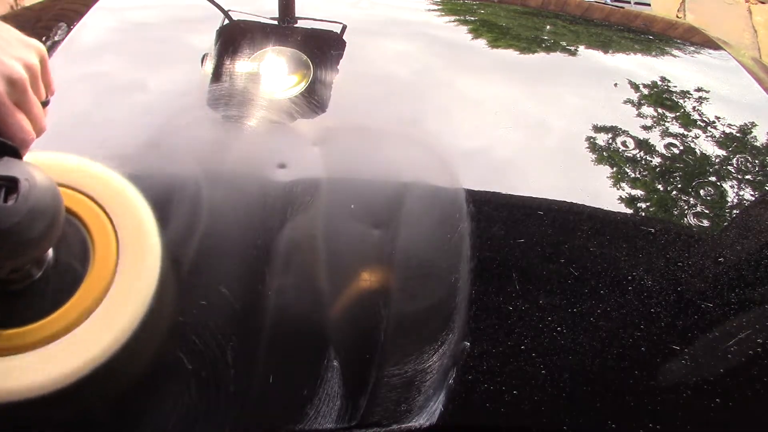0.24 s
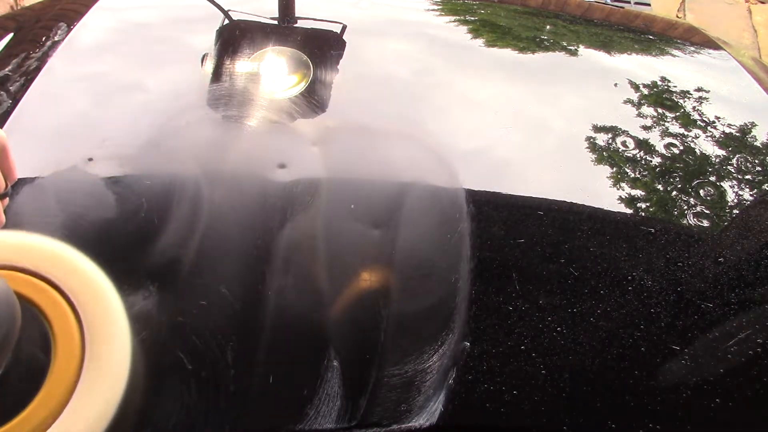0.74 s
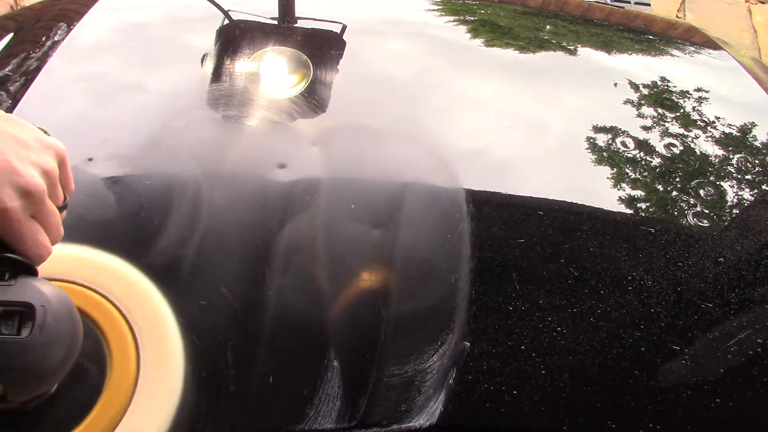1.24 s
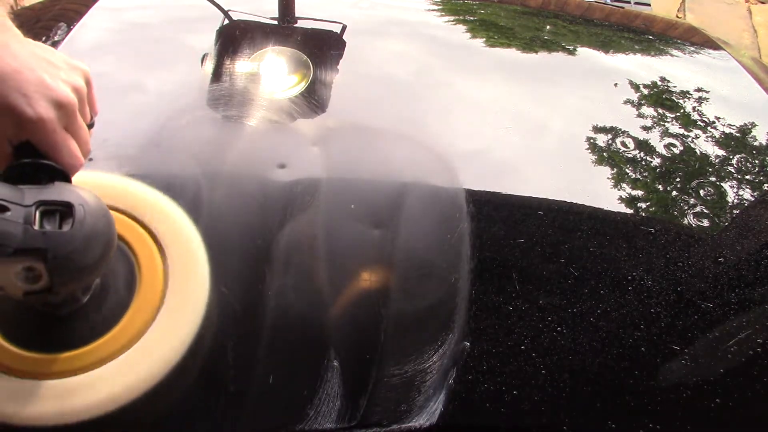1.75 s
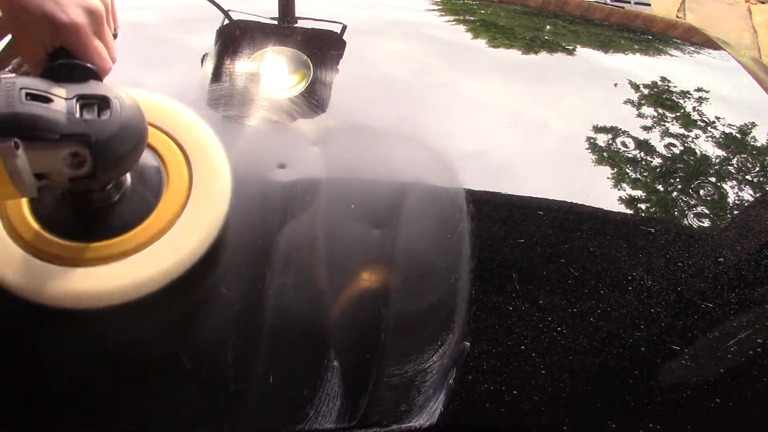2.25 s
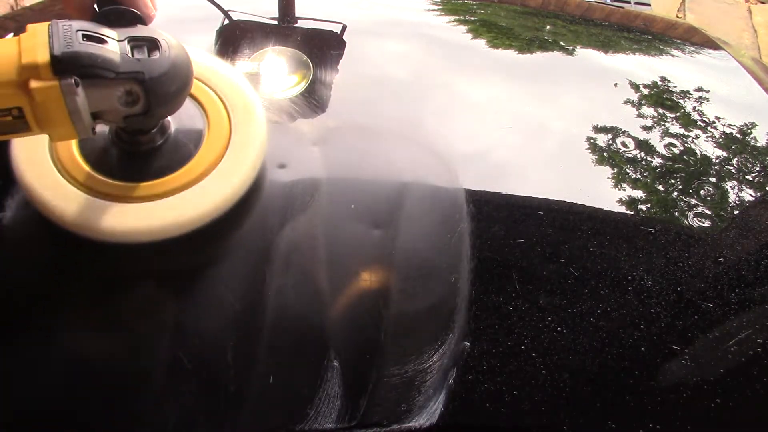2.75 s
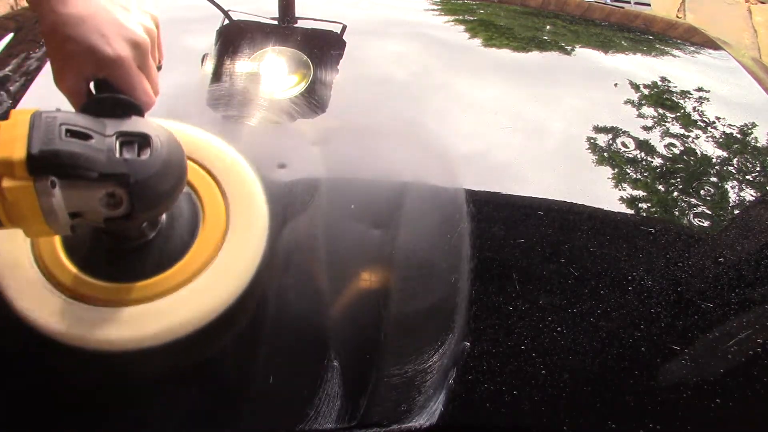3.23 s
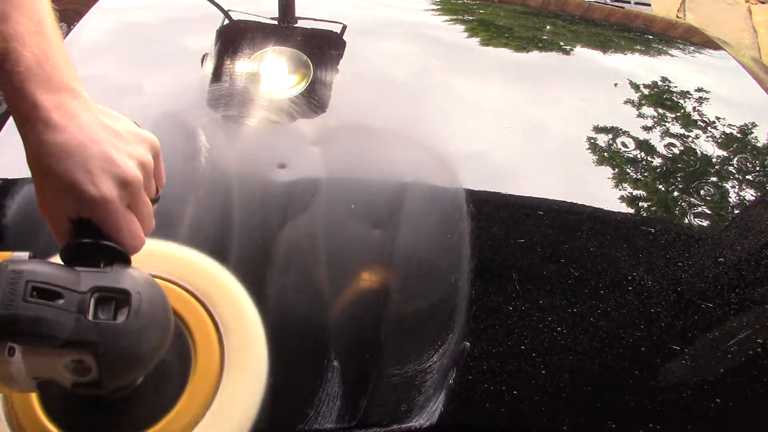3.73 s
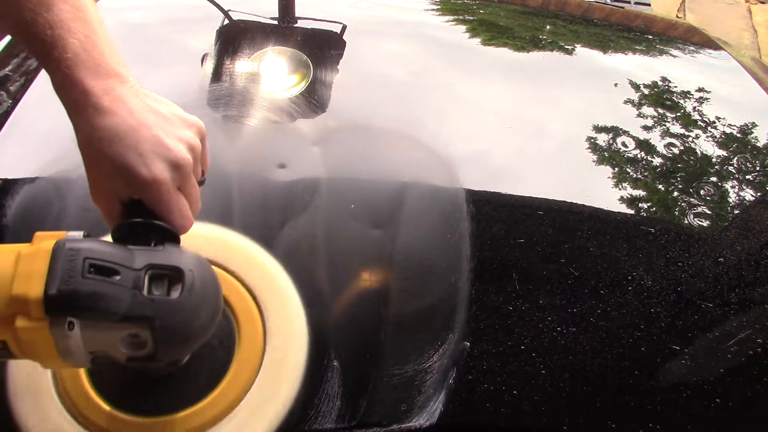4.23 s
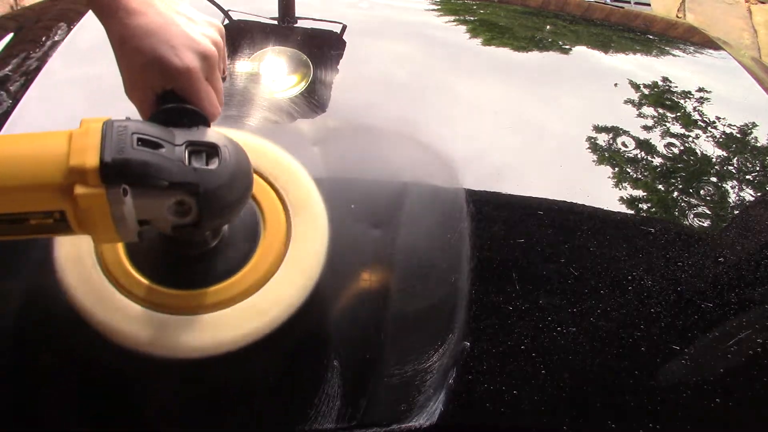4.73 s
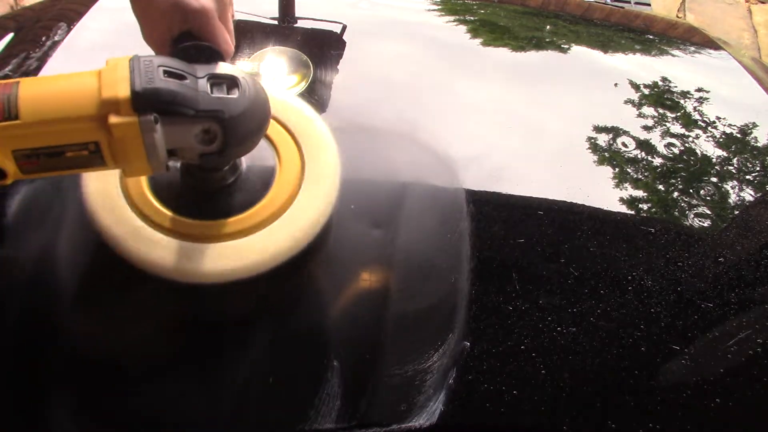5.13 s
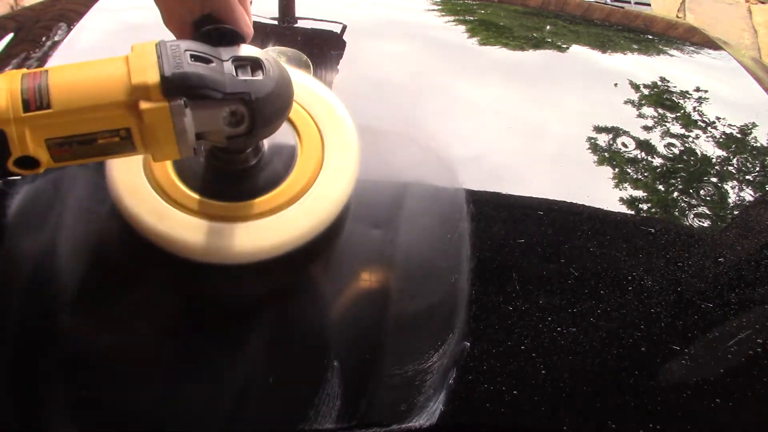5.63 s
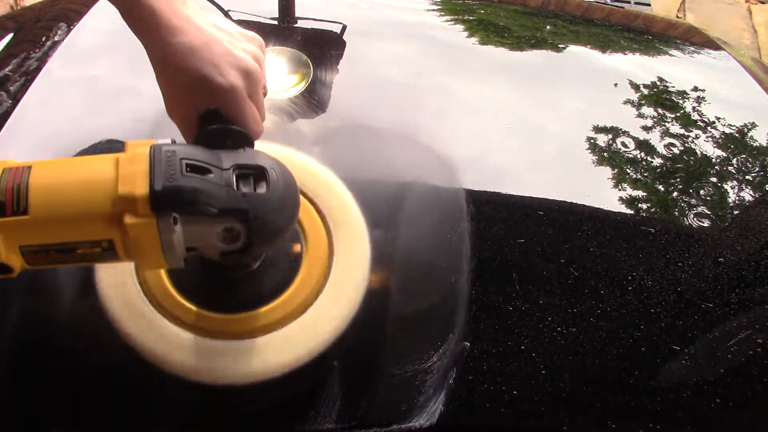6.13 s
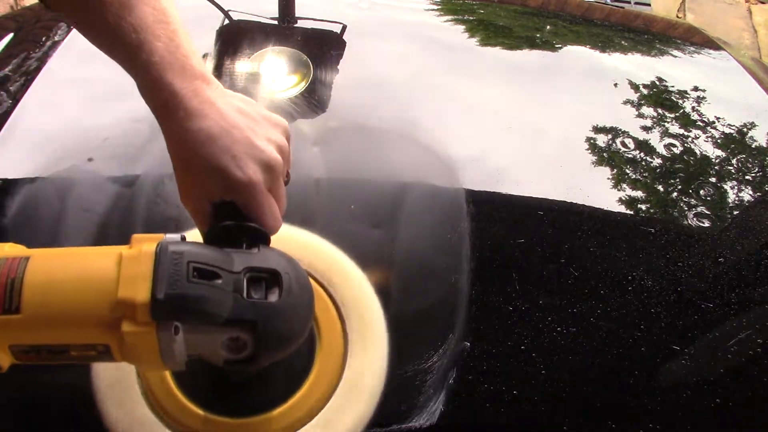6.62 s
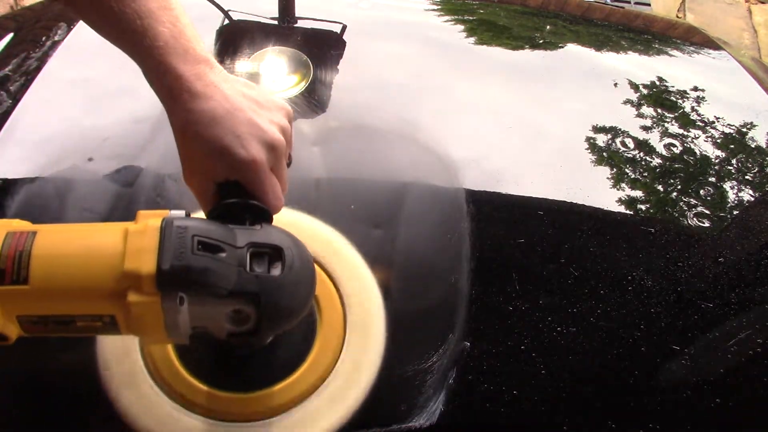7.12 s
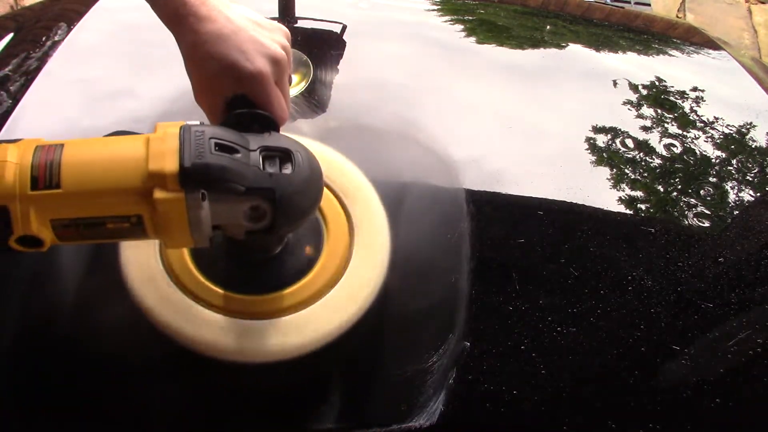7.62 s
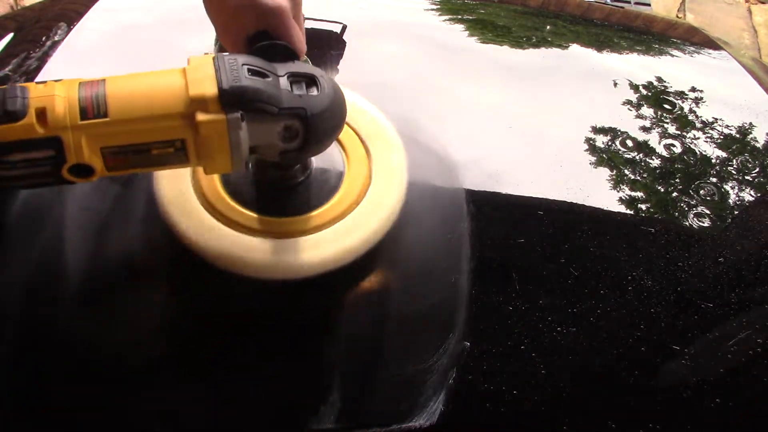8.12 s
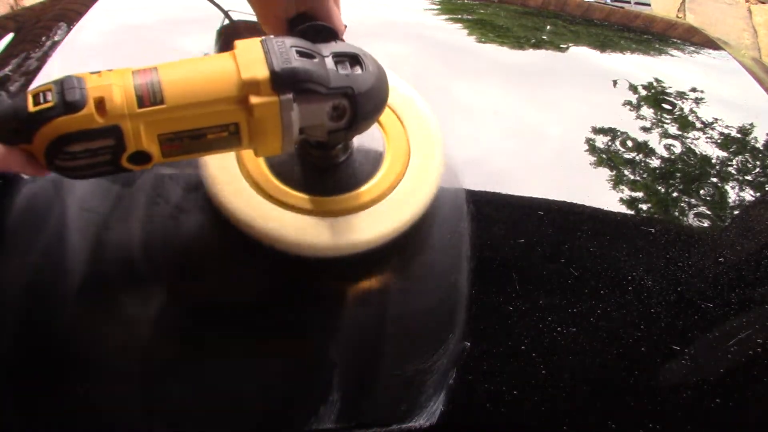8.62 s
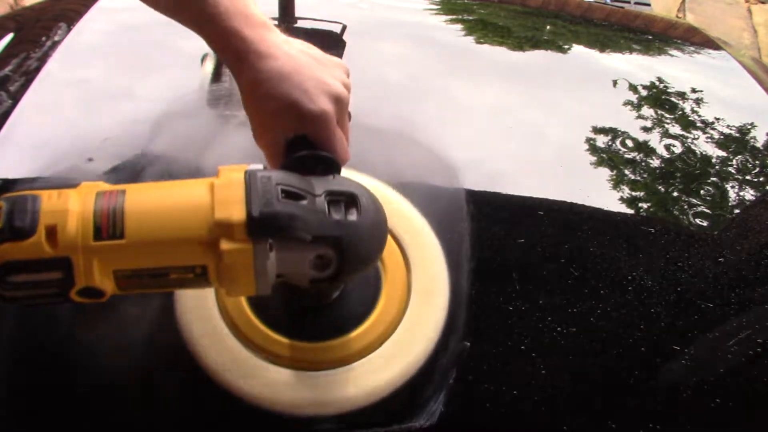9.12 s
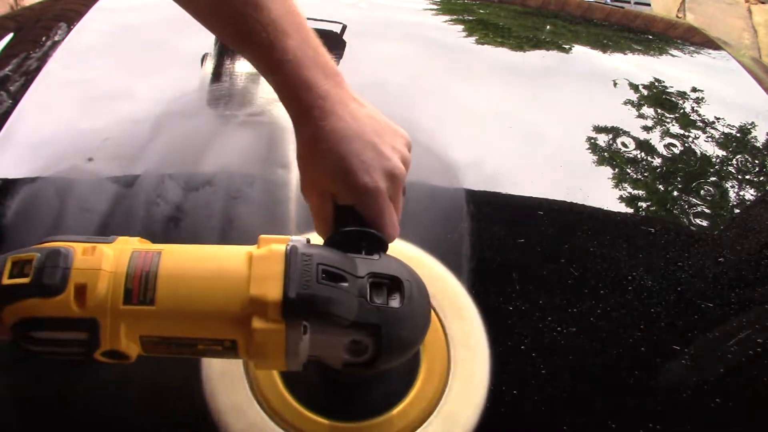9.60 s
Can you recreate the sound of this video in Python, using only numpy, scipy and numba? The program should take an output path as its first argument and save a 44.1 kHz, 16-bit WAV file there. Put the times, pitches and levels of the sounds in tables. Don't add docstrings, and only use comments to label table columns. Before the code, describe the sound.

A rotary polisher runs without a break close to a small camera microphone at an open garage. A bright, layered electric whine sits over gritty gear rattle and rushing motor air. The tone stays nearly steady in pitch but brightens and dulls as the tool sweeps back and forth across the car panel, while a soft metal hum swells and fades beneath.

```python
import sys
import numpy as np
from scipy import signal
from scipy.io import wavfile
from scipy.ndimage import uniform_filter1d, minimum_filter1d, map_coordinates
from numba import njit

SR = 44100
rng = np.random.default_rng(int(sys.argv[2]) if len(sys.argv) > 2 else 0)


def ratio_of_db(decibels):
    return 10 ** (np.asarray(decibels, float) / 20)


def wrap_up_sound(samples):
    columns = np.atleast_2d(samples).T
    tamed = np.clip(columns, -1, 1)
    steps = np.round(tamed * 32767).astype(np.int16)
    wavfile.write(sys.argv[1], SR, steps)


N = 434826
SLOW_S = np.arange(0, N / SR + .01, .01)
RIPPLE_HZ = 120.05

# (time [s], nearness to the loose middle of the panel, pressure,
# roll of the rear vents to the microphone, tilt of the gear case to it)
HOLD = [(0.0, -0.19, 0.066, -0.049, 0.16), (0.41, -0.094, -0.72, 0.48, 0.09), (1.23, -0.02, -1, 0.54, 0.58),
        (1.89, 0.24, 0.12, -0.3, 0.052), (2.07, 0.24, 0.34, -0.33, 0.4), (2.9, -0.077, -0.27, -0.87, -0.05),
        (3.35, 0.3, 0.23, -0.091, 0.09), (4.01, -0.084, -0.81, 0.94, 0.039),
        (4.91, 0.62, 0.41, -0.42, -0.11), (5.52, -0.77, 0.023, -0.66, -0.26), (5.9, 0.2, -0.4, -0.67, -0.2),
        (6.38, 0.42, -0.61, 0.13, 0.15), (6.76, -0.21, -0.73, 0.33, -0.46), (7.82, 0.24, 1.0, -0.17, 0.057),
        (8.49, -1.13, 0.0063, -0.44, 0.4), (8.82, -0.7, 0.089, 0.13, 0.25),
        (9.55, -0.5, -0.075, 0.19, -0.96), (9.86, -0.89, 0.36, 0.025, -0.49)]
# (middle [s], length [s], level [dB], ring frequency [Hz])
PART_GLINTS = [(0.1, 0.9, -3.12, 7950), (0.44, 0.75, -11, 7300), (0.56, 2, -4.5, 8600),
               (0.74, 1.5, -5, 7950), (1.14, 1.3, 3.5, 5100), (2.66, 1.3, 2, 8600),
               (2.76, 0.65, -6.19, 120), (4.96, 1.2, 1.27, 3500), (6.3, 1.3, 2.5, 120),
               (6.56, 1.2, 2.5, 7950), (7.14, 0.55, -1.81, 5100), (7.82, 1.2, -0.3, 5100),
               (8.5, 0.9, 11, 7950), (8.6, 0.8, -0.5, 5100), (9.1, 0.55, 2.5, 5100),
               (9.18, 0.7, -1.2, 3500), (9.7, 0.9, 0, 7300), (9.86, 1.2, -7, 7950)]


def curves(table):
    s, *columns = np.transpose(table)
    return np.array([np.interp(SLOW_S, s, c) for c in columns])


def swells(rows, only=None):
    if only is not None:
        rows = [row for row in rows if abs(row[3] / only - 1) < .015]
    total = 0 * SLOW_S
    for middle, length, size, *_ in rows:
        total = total + size * np.cos(np.pi * np.clip((SLOW_S - middle) / length, -.5, .5)) ** 2
    return total


def fast(slow):
    return np.interp(np.arange(N) / SR, SLOW_S, slow)


def walk(rate):
    k = int(SR / rate)
    steps = np.repeat(rng.standard_normal(N // k + 1), k)[:N]
    return 1.3 * uniform_filter1d(uniform_filter1d(steps, k), k)


@njit
def svf(x, hz, width):
    y, b, l = np.empty(len(x)), 0., 0.
    g, k = np.tan(np.pi * hz / SR), width / hz
    for i in range(len(x)):
        v = (b + g * (x[i] - l)) / (1 + g * (g + k))
        b, l, y[i] = 2 * v - b, l + 2 * g * v, k * v
    return y


def tone(phase, db, beat, flutter, throb):
    lag, start = rng.uniform(-.8, .8), rng.uniform(0, 2 * np.pi)
    size = ratio_of_db(db + 3.5 * flutter * walk(70.)) * (1 + throb * np.cos(beat + lag))
    return np.sqrt(2) * size * np.sin(phase + start + flutter * walk(45.))


def facing_db(hz):
    # (ring frequency [Hz], then [dB] per unit of nearness, pressure, roll, tilt)
    ringing_parts = [
        (1950.0, 0, 0, -1.5, 1.7),
        (3500.0, -2.5, 0.7, -1.7, 4),
        (5100.0, 3, 5.5, 1, -2.5),
        (6430, 6, -1.5, -0.5, 1.5),
        (7300.0, -4.5, -0.5, 7, -0.5),
        (7950.0, 4.5, 0.2, 2, -1.2),
        (8600.0, 0.6, 1, 1.7, -2),
    ]
    parts = np.array(ringing_parts)
    place = np.interp(np.log(hz), np.log(parts[:, 0]), np.arange(7))
    low = min(int(place), 5)
    below, above = (part[1:] @ curves(HOLD) + swells(PART_GLINTS, part[0]) for part in parts[low:low + 2])
    blend = below + (place - low) * (above - below)
    return fast(min(hz / 1800, 1) ** 2 * blend)


def armature_turn():
    # (time [s], armature turns [Hz])
    speed_points = [(0.0, 104.43), (0.91, 104.65), (1.38, 105.59), (1.56, 104.15), (2.84, 104.6),
                    (3.25, 105.12), (3.4, 103.21), (3.69, 105.09), (4.86, 103.34), (5.27, 104.96),
                    (6.1, 105.57), (6.75, 105.23), (6.89, 103.83), (8.04, 103.17), (8.39, 105.7),
                    (9.22, 103.91), (9.55, 106.39), (9.86, 103.0)]
    # (middle [s], length [s], change of turns [Hz])
    hand_shoves = [(0.12, 0.16, -0.44), (0.94, 0.2, -0.35), (1.06, 0.16, 0.47), (1.76, 0.16, 0.55),
                   (2.2, 0.2, -0.58), (2.36, 0.26, 0.63), (2.54, 0.2, -0.48), (4.02, 0.26, -0.33),
                   (4.18, 0.2, 0.6), (4.84, 0.2, -0.36), (5.82, 0.26, -0.74), (6.04, 0.45, 0.36),
                   (7.42, 0.2, 0.66), (7.64, 0.26, -0.65), (7.84, 0.2, 0.46), (8.6, 0.16, -0.42),
                   (8.76, 0.2, 0.45), (8.92, 0.26, -0.31), (9.38, 0.26, -0.39), (9.54, 0.2, 0.54),
                   (9.7, 0.2, -0.54), (9.86, 0.12, 0.7)]
    return 2 * np.pi * np.cumsum(fast(curves(speed_points)[0] + swells(hand_shoves))) / SR


def singing_db():
    # (start [s], length [s], level [dB])
    catches = [(.12, 0.45, -25), (1.58, 0.22, -21), (2.287, 0.74, -16.5), (3.327, 0.23, -19),
               (3.6, .1, -22), (3.74, 0.13, -18), (4.283, 0.49, -18), (5.2, 0.54, -17.5),
               (6.297, 1.35, -18), (7.05, .3, -15), (8.2, 0.5, -19), (9.01, 1.0, -17)]
    rest_db, ramp_s = -27.5, .12
    lifts = []
    for start, length, db in catches:
        inside_s = np.minimum(SLOW_S - start, start + length - SLOW_S)
        lifts.append((db - rest_db) * np.clip(inside_s / ramp_s + .5, 0, 1))
    return fast(rest_db + np.max(lifts, axis=0)) + walk(6.)


def whine(turn, beat):
    # (multiple of the turn, level [dB], then [dB] per unit of nearness, pressure, roll, tilt)
    main_tones = [
        (6.0, -32.0, -0.9, -3, -2.5, 7.2),
        (12.0, -36.5, 0.8, 7, 2.8, -1.5),
        (18.0, -33.5, -4.5, 3.6, -11, 1),
        (42.0, -22.5, -0.5, 0.5, -3.0, -9.9),
        (66.1, -39.5, -4.5, 9, 11, 5),
        (24.0, -22, 4.5, 3, 2.2, 5.5),
        (26.0, -23.5, 0, -0.4, -4, 6.5),
        (27.0, -25, 2.5, 3.5, 6, 11),
        (32.0, -31, -8.5, 8, -0.5, 2),
    ]
    # (level [dB], then [dB] per unit of nearness, pressure, roll, tilt)
    beside_mesh = (-48, -2, -5.5, -6.5, 1)
    # (multiple of the turn, level [dB])
    weak_tones = [(1, -62), (2, -51.5), (5, -44), (11, -50), (14, -53), (17, -35), (19, -35.5), (20, -40),
                  (23, -29), (28, -34), (29, -46), (33, -35.5), (35, -31.5), (36, -34), (38, -33),
                  (40, -32.5), (41, -41), (43, -40), (48, -33.5), (50, -29.5), (57, -44), (60, -56),
                  (61, -50), (67, -40.5), (69, -53), (70, -55), (71, -50), (75, -50), (76, -46.5)]
    # (middle [s], length [s], level [dB], multiple of the turn)
    paint_fades = [(0.34, 0.9, 3.5, 24), (0.6, 1.3, 6, 32), (0.78, 0.55, -14, 18), (1.12, 0.86, -8.5, 24),
                   (1.16, 0.55, -11, 12), (1.74, 0.7, -12, 66), (2.78, 0.7, 0, 27), (3.16, 0.33, -2, 27),
                   (3.5, 1.2, -7, 12), (3.68, 1.1, 2.5, 24), (3.72, 0.87, -5.5, 6), (4.44, 0.55, 4.85, 24),
                   (4.78, 0.62, -5, 26), (4.88, 0.66, 4, 27), (4.96, 0.97, -7, 32), (5.08, 0.4, -4, 6),
                   (5.98, 0.3, -6.43, 27), (6.32, 1.2, 2.5, 6), (6.72, 0.64, -9, 24), (6.78, 0.4, -12, 32),
                   (6.88, 0.4, -9, 6), (6.92, 1, 2.5, 27), (7.26, 0.55, 2, 26), (7.4, 0.42, 4, 6),
                   (7.74, 0.67, -6, 24), (9.06, 0.76, -3, 18), (9.22, 0.43, 7, 26), (9.58, 0.34, -1, 27)]
    out = 0
    for k, db, *lean in list(main_tones) + [(7, *beside_mesh)]:
        k = round(k)
        if k == 42:
            level = singing_db()
        else:
            level = fast(db + lean @ curves(HOLD) + swells(paint_fades, k))
        sound = tone(k * turn, level, beat, flutter=0.31 + 0.0018 * k, throb=0.068)
        if k == 6:
            sound = sound * (1 + .25 * np.cos(6 / 49 * turn))
        out = out + sound
    for k, db in weak_tones:
        level = db + facing_db(105 * k) + 2.2 * walk(1.15)
        out = out + tone(k * turn, level, beat, flutter=0.24 + 0.0021 * k, throb=.25 * min(k / 45, 1))
    return out


def clatter(turn, memory):
    steps = 512
    fresh = rng.standard_normal((int(turn[-1] / (2 * np.pi)) + 3, steps))
    worn = signal.lfilter([1], [1, -memory], fresh, axis=0).ravel()
    return map_coordinates(worn, [turn * steps / (2 * np.pi) + 8], order=3)


def rattle(turn, mains, beat):
    # (frequency [Hz], level [dB per Hz])
    noise_floor = [(40, -20), (130, -11.5), (170, -23), (420, -10), (800, -16.5), (1500, -13), (1900, -4.5),
                   (3100, -7.5), (4700, -6), (5800, -13), (6600, -17), (8600, -21), (10500, -30),
                   (15700, -41)]
    # (frequency [Hz], depth per turn, per half turn, per mains ripple, of the slow throb, grit [dB])
    gate_depths = [(300, 0.12, 0.037, 0.58, 0.024, 2), (2620, 0.026, 0.55, 0.58, 0.014, 0.5),
                   (4700, 0.16, 0.1, 0.17, 0.12, 1.5), (7160, 0.52, 0.13, 0.033, 0.054, 0.3),
                   (12000, 0.14, .12, 0.11, 0.098, 2)]
    # (frequency [Hz], width [Hz], level above the noise [dB])
    housing_rings = [(1215, 181, 8.5), (2592, 157, 9), (2940, 120, -3.5), (3270, 710, 1.5), (4433, 140, 6),
                     (5148, 640, 11.5), (7330, 520, 9), (8070, 360, 7.5)]
    floor, gating = np.transpose(noise_floor), np.transpose(gate_depths)
    grit = rng.exponential(size=N // 40 + 1).repeat(40)[:N]
    sources = [clatter(turn, memory=0.27) for _ in range(3)]
    shudder_db = .4 * walk(60.)
    pressure = fast(curves(HOLD)[1])
    waves = np.cos([turn, 2 * turn, mains, beat]) * (1 + 0.13 * pressure)
    waves[3] *= 1 + .9 * pressure
    centres = np.r_[60 * 2 ** np.arange(0, 4.6, 1 / 4), 1450 * 2 ** np.arange(0, 3.45, 1 / 16)]
    out = 0
    for k, (hz, width) in enumerate(zip(centres, np.gradient(centres))):
        if k % 3 == 0:
            *depth, grit_db = (np.interp(np.log(hz), np.log(gating[0]), g) for g in gating[1:])
            gate = np.exp(depth @ waves) * ratio_of_db(grit_db * grit)
        band = svf(svf(sources[k % 3] * gate, hz, 1.25 * width), hz, 1.25 * width)
        db = np.interp(np.log(hz), np.log(floor[0]), floor[1]) + 10 * np.log10(width)
        for ring_hz, ring_width, lift in housing_rings:
            db += lift * np.exp(-((hz - ring_hz) / (0.5 * ring_width)) ** 2)
        level = db + facing_db(hz) + 0.88 * walk(1.29) + shudder_db
        out = out + band / band.std() * ratio_of_db(level)
    return out / out.std() * ratio_of_db(-15.5)


def panel(turn, mains, beat):
    # (multiple of the mains ripple, multiple of the turn, level [dB], [dB] per unit of roll)
    buzz_tones = [
        (1, 1, -47, -3.5),
        (2, 0, -46.5, 1),
        (1, 2, -55, 0.1),
        (3, 0, -47.5, -1),
        (4, 0, -39.5, -4),
    ]
    # (middle [s], length [s], level [dB])
    stiffener_dips = [
        (.5, .3, -5),
        (.75, .3, -3),
        (1.25, .3, -7),
        (2.75, 0.76, -17),
        (5.45, .8, -14),
        (6.75, .3, -8),
        (8.45, 1.1, -13),
        (9.3, .3, -3),
    ]
    nearness, _, roll, _ = curves(HOLD)
    hum_db = fast(-42 + 11 * nearness + swells(PART_GLINTS, RIPPLE_HZ) + swells(stiffener_dips))
    out = tone(mains, hum_db, beat, flutter=0.13, throb=0.15)
    for m, k, db, roll_db in buzz_tones:
        level = db + roll_db * fast(roll) + 1.3 * walk(1.72)
        out = out + tone(m * mains + k * turn, level, beat, flutter=0.17, throb=0.15)
    return out


def breeze():
    # (middle [s], length [s], level [dB])
    wind_gusts = [
        (1.18, 0.5, 2),
        (2.0, 1.6, 5),
        (3.68, 1.5, 5),
        (5.94, 0.5, -7),
        (6.56, 0.5, 6),
        (7.36, 0.22, 5.47),
        (7.48, 1.5, 8.5),
        (7.5, 0.2, -6.1),
        (8.5, 1.9, 6.5),
    ]
    air = svf(svf(rng.standard_normal(N), 40.0, 45.), 40.0, 45.)
    return air / air.std() * ratio_of_db(fast(-48.5 + swells(wind_gusts)) + 2.4 * walk(8.8))


def scene():
    turn = armature_turn()
    mains = 2 * np.pi * RIPPLE_HZ * np.arange(N) / SR
    beat = mains - turn
    turn = turn + .013 * np.sin(beat) + .011 * walk(18.)
    load = 1 + 0.15 * np.cos(mains) + 0.22 * np.cos(turn)
    mix = load * whine(turn, beat) + rattle(turn, mains, beat) + panel(turn, mains, beat) + breeze()
    return mix[None]


def band_limit(x):
    return signal.sosfilt(signal.butter(12, 15720, fs=SR, output="sos"), x)


def record(dry):
    duck = minimum_filter1d(np.minimum(.89 / (abs(dry) + 1e-9), 1), size=129)
    held = dry * uniform_filter1d(uniform_filter1d(duck, size=64), size=64)
    held = signal.sosfilt(signal.ellip(10, .2, 70, 15650, fs=SR, output="sos"), held)
    return band_limit(held)


dry = scene()
out = record(dry)
wrap_up_sound(out)
```